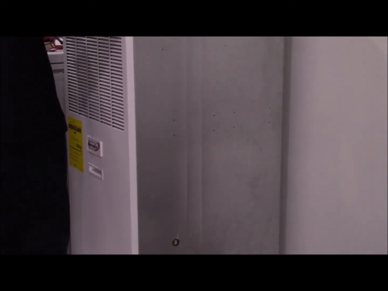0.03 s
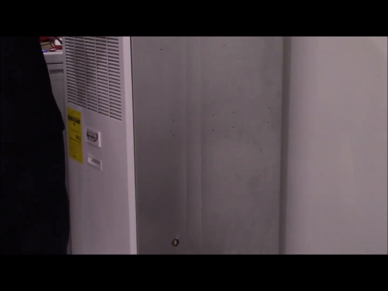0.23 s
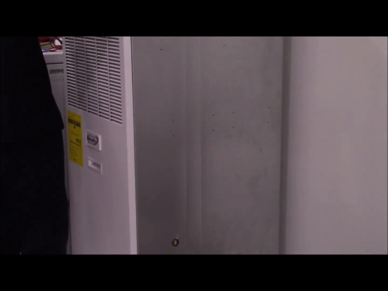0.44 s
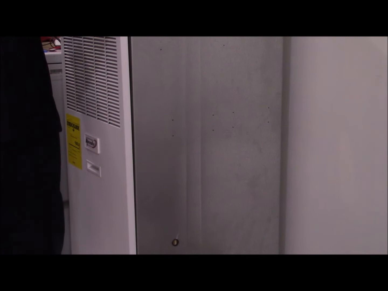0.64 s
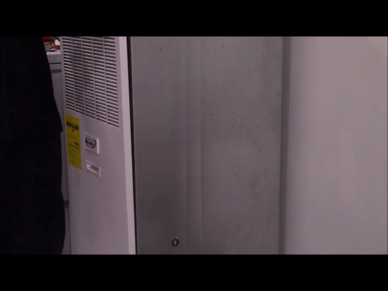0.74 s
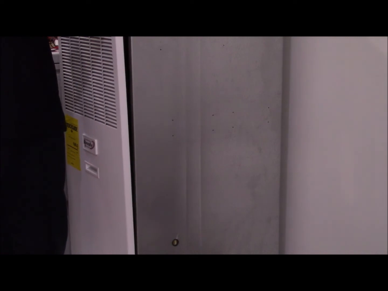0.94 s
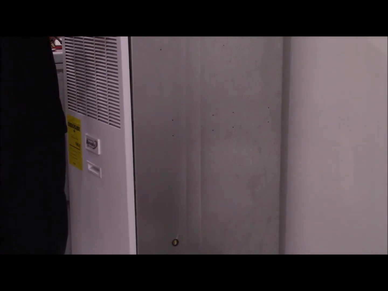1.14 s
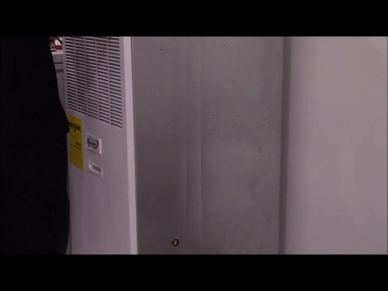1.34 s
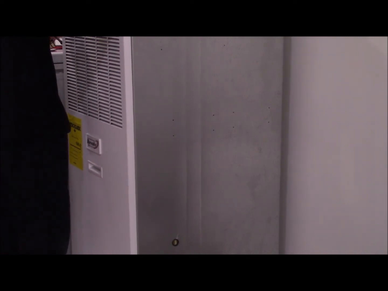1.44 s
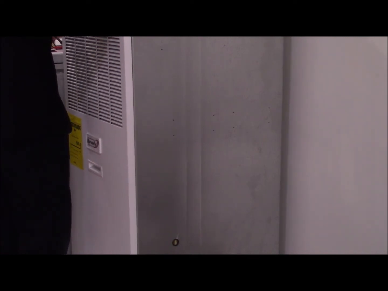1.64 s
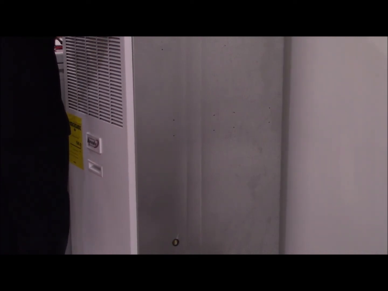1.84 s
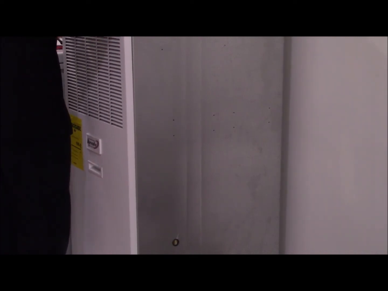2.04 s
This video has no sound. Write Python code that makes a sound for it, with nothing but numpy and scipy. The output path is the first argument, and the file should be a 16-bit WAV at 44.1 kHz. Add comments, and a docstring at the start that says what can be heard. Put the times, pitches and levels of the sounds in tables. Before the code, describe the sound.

A sheet-metal furnace cover is fitted in a small room, close and nearly central. Light knocks at 0.1 s lead into a gritty slide and loud, boomy, ringing bangs from 0.23 to 0.6 s. A bright, hard clank snaps it home at 0.84 s and rings away. Soft taps follow from 1.1 s, a duller knock at 1.32, a tiny squeak at 1.38, and a short rub near 1.72 s over faint hum.

```python
"""Furnace cover pushed home

Small utility room, a stereo microphone pair, a tall sheet-metal cover in front and nearly central.
Knocks excite decaying panel and frame modes in dense noise; random stick-slip taps make the scrapes.
The edge snaps home with a bright clank (a noise crack), then softer knocks, a tiny squeak of
narrow-band noise and a last rub. Filtered room noise and a faint mains hum (a sine) lie underneath."""
import sys
import numpy as np
from scipy import signal
from scipy.fft import rfft, irfft
from scipy.io import wavfile

SR = 44100
rng = np.random.default_rng(int(sys.argv[2]) if len(sys.argv) > 2 else 0)


def master_out(mix):
    """Clip the mix to full scale and print it as 16-bit PCM to the path in sys.argv[1]."""
    frames = np.transpose(np.atleast_2d(mix))
    ceiling = np.clip(frames, -1, 1)
    pcm = np.round(ceiling * 32767).astype(np.int16)
    wavfile.write(sys.argv[1], SR, pcm)


N = 92610  # 2.1 s


def amp(db):
    """Decibels to gain."""
    return 10 ** (np.asarray(db) / 20)


def unit(x):
    """Scales to rms 1."""
    return x / np.sqrt(np.mean(x ** 2) + 1e-20)


def read(points, hz):
    """Reads (f/Hz, value) points on a log-frequency axis."""
    f, value = np.transpose(points)
    return np.interp(np.log(hz + 1), np.log(f + 1), value)


def add(mix, s, sound):
    """Mixes a sound in at time s."""
    part = mix[max(round(s * SR), 0):][:len(sound)]
    part += sound[:len(part)]


def colour(x, points, size=4096):
    """Causal minimum-phase filter with the given (f/Hz, level/dB) response."""
    hz = abs(np.fft.fftfreq(size, 1 / SR))
    log_gain = np.log(amp(read(points, hz)))
    # the Hilbert transform of the log gain gives the minimum phase
    response = np.exp(np.conj(signal.hilbert(log_gain)))
    taps = np.fft.ifft(response).real
    return signal.fftconvolve(x, taps[:size // 2])[:len(x)]


# Frequencies at which the tone of a knock is given: f/Hz
TONE_HZ = [110, 350, 560, 900, 2000, 5000, 11000]
# Blows on the cover: t/s, seven strengths at TONE_HZ level/dB, frame's share of the modes (0-1)
KNOCKS = [(0.0954, -14.5, -15, -21, -13, -30.5, -26.5, -19.5, 0.034),
          (0.115, -18.5, -19.5, -26, -20.5, -42, -35, -40, 0.046),
          (0.2295, -27, -7.5, -15.5, -15, -18, -16, -21, 0.042),
          (0.2657, -3.5, 2.5, 1, 2, -7, -2, 3, 0.039), (0.2734, -5, 1.5, 2.5, -0.5, -3.5, -5, -0.5, 0.041),
          (0.3108, -5.5, -10, -23, -3.5, -0.5, -13, -12, 0.031),
          (.336, 0.5, -16.5, -6.5, -8.5, -7, -8.5, -19, 0.044),
          (0.3537, -17, -11, -44, -50, -0.5, -3.5, -7.5, 0.075),
          (.435, -6, -18, -27, -34, -30, -14.5, -22, 0.068),
          (0.5126, -2.5, -14, -8.5, -11, -11.5, -19, -21, 0.054),
          (0.548, -11, -19, -21, -15, -19, -33, -16, 0.07),
          (.562, -10.5, -7, -8, -41, -15.5, -38, -32, 0.11), (.588, -19, -29, -9, -25, -27, -12, -21, 0.11),
          (.602, -15, -35, -24, -21.5, -13.5, -18, -11.5, 0.29),
          (0.647, -18, -36, -45, -13.5, -55, -19.5, -13.5, 0.17),
          (0.7688, -13, -46, -36, -28, -29.5, -27, -31.5, 0.49),
          (0.8281, -9, -39, -30, -11.5, -7, -5.5, -6.5, 0.87), (0.8411, -15, -4, -6.5, 0, 6, 4, 4.5, 0.83),
          (1.112, -22, -28, -48, -38, -35, -29.5, -37, 0.42),
          (1.168, -34, -36, -47, -27.5, -45, -38, -44, 0.057),
          (1.211, -32, -21.5, -25, -23.5, -25.5, -31, -21.5, 0.33),
          (1.277, -21, -30, -27.5, -27, -31, -29, -36, 0.27),
          (1.3152, -9.5, -11.5, -10, -12, -20.5, -24.5, -23.5, 0.014),
          (1.364, -17, -17, -17, -16.5, -36, -38, -48, 0.016),
          (1.5495, -33, -42, -42, -40, -41, -37, -38, .1),
          (1.72, -11, -27.5, -28.5, -31, -22.5, -32.5, -33, 0.37),
          (1.788, -12.5, -47, -32.5, -33, -52, -50, -44, 0.05)]
EARLIER_RING_DB, EARLIER_AGE_S = -23.5, .08  # the panel is still ringing as the scene opens


def knocks():
    """Each blow lands on another spot of the sheet and so has its own tone."""
    out = np.zeros(N)
    for s, *tone_db, frame_share in KNOCKS:
        tone = list(zip(TONE_HZ, tone_db))
        add(out, s, colour(ring(frame_share), tone))
    earlier = ring(0)[round(EARLIER_AGE_S * SR):]
    add(out, 0, amp(EARLIER_RING_DB) * earlier)
    return out


# Dense ring of sheet and room:
# f/Hz, rise/s, t60 of the first clatter/s, tail level/dB, t60 of the tail/s
RING = [(90, 0.014, 0.074, -1, 0.77), (204, 0.022, 0.14, 7.5, 0.58), (390, 0.0028, 0.23, -3, 0.71),
        (1070, 0.0016, 0.15, -2.5, 0.47), (2440, 0.00071, 0.18, -1.5, 0.42),
        (5500, 0.0025, 0.16, -1.5, 0.38), (11900, 0.0023, 0.057, 3.5, 0.19)]
# Clear modes of the panel: f/Hz, level/dB, t60/s
PANEL_MODES = [(92, -23, 0.61), (234.9, -22.5, 0.64), (327.7, -26, 0.75), (356, -20, 0.75),
               (378.4, -30.5, 0.3), (490.7, -26.5, 0.65), (550.3, -24.5, 0.5), (611.7, -25.5, 0.53),
               (671.4, -24.5, 0.52), (797, -18, 0.37), (895, -45, .4), (1191, -15.5, 0.25),
               (1772, -39, 0.22), (2004, -24.5, .55), (2710, -17, 0.38), (3120, -25, 0.27)]
# Clear modes of the frame: f/Hz, level/dB, t60/s
FRAME_MODES = [(340.4, -17, 0.17), (373.7, -13.5, 0.3), (692, -20.5, .5), (1063, -12.5, 0.2),
               (1136, -28, 0.65), (1397, -7.5, 0.2), (1600, -19, 0.28), (1883, -12, 0.24),
               (2110, -34, 0.22), (2190, -27, .33), (2490, -14.5, 0.31), (2798, -27, 0.61),
               (3590, -17, 0.32), (3770, -14, 0.11), (4640, -13, 0.25)]
CLATTER_DB = 4  # first clatter in every band of a tap


def ring(frame_share):
    """Answer to one tap: a quick clatter, a tail in the room, and the clear modes of panel and frame."""
    t, hz = np.arange(SR) / SR, np.fft.rfftfreq(SR, 1 / SR)
    dense = rfft(rng.standard_normal(SR))
    centres = [row[0] for row in RING]
    out = np.zeros(SR)
    # each band fades into its neighbours
    for own, (_, rise, clatter_t60, tail_db, tail_t60) in zip(np.eye(len(RING)), RING):
        weight = read(list(zip(centres, own)), hz)
        band = irfft(dense * weight, SR)
        clatter = amp(CLATTER_DB - 60 * t / clatter_t60)
        tail = amp(tail_db - 60 * t / tail_t60)
        out += band * (1 - np.exp(-t / rise)) * np.hypot(clatter, tail)
    share = np.clip(frame_share, 0, 1)
    panel = np.sqrt(1 - share) * modes(PANEL_MODES, t)
    frame = np.sqrt(share) * modes(FRAME_MODES, t)
    return out + panel + frame


def modes(table, t):
    """Decaying partials, each starting at a random phase."""
    out = np.zeros(len(t))
    for hz, db, t60 in table:
        out += amp(db - 60 * t / t60) * np.sin(2 * np.pi * (hz * t + rng.random()))
    return out


# Spectrum of the crack: f/Hz, level/dB
SNAP = [(200, -41), (800, -30), (1400, 6), (2100, -12), (3100, 7.5), (4200, -11), (6000, -7), (8000, -32),
        (10300, -9), (15000, -39)]
SNAP_S, SNAP_RISE_S, SNAP_T60_S = .8412, 0.0011, 0.073
SNAP_DB = -11  # of the unit-rms noise, before its rise and decay


def snap():
    """The edge springs past the lip of the frame: the hard, bright crack at the front of the clank."""
    t, out = np.arange(SR // 4) / SR, np.zeros(N)
    crack = unit(colour(rng.standard_normal(len(t)), SNAP))
    rise = 1 - np.exp(-t / SNAP_RISE_S)
    add(out, SNAP_S, crack * rise * amp(SNAP_DB - 60 * t / SNAP_T60_S))
    return out


# Three strokes along the frame: the long slide in, a soft nudge, the last rub.
# Columns of each: t/s, friction level/dB, boom of the sheet level/dB, grit level/dB
SLIDE = [(.13, -33.5, -12, 8), (.19, -17, -15, -3), (.238, -11, -6, 1), (.262, -12, -13, 0),
         (.3, -10.5, 10, 11.5), (.365, -10.5, -1, -8), (.39, -23.5, 21.5, -9), (.45, -11.5, -34, -2),
         (.54, -11.5, -1, -10), (.58, -28.5, 1, 4), (.62, -29.5, 0, 6.5), (.69, -30.5, 6, 4.5),
         (.73, -31, -6, -8)]
NUDGE = [(1.14, -48, 0, 14), (1.18, -38, 0.014, -11), (1.228, -32, 0, 0), (1.25, -44, 0.19, 2),
         (1.31, -34.5, 0, -17), (1.34, -25.5, -2, -10), (1.38, -42, 0, -4)]
RUB = [(1.688, -37, 16, 11), (1.708, -20.5, -1, -12), (1.725, -23, 0, -11), (1.748, -22.5, -6, -20),
       (1.77, -40.5, 21.5, -8), (1.82, -42, 14, -6), (1.87, -57, 19, 1), (1.96, -40.5, 17, -15),
       (2.02, -54, 5, 0)]
SLIPS_PER_S = 1200  # on average
SLIP_SPREAD_DB = 5.  # times an exponential draw of mean 1, capped at 3
BOOM_HZ, GRIT_HZ = 203, 3900  # boom lies below, grit above


def scrape(stroke, frame_share=.15):
    """The edge sticks and slips along the frame; every slip taps the sheet."""
    t = np.arange(N) / SR
    s, *columns = np.transpose(stroke)
    level, boom, grit = [amp(np.interp(t, s, c)) for c in columns]
    happens = rng.random(N) < SLIPS_PER_S / SR
    sign = rng.choice([-1, 1], N)
    strength = amp(SLIP_SPREAD_DB * np.minimum(rng.exponential(1, N), 3))
    slips = unit(happens * sign * strength)
    low = signal.sosfilt(signal.butter(1, BOOM_HZ, fs=SR, output="sos"), slips)
    high = signal.sosfilt(signal.butter(1, GRIT_HZ, "high", fs=SR, output="sos"), slips)
    moving = (t > s[0]) * (t < s[-1])
    force = level * (slips + (boom - 1) * low + (grit - 1) * high) * moving
    answer = ring(frame_share)
    return signal.fftconvolve(force, answer / np.linalg.norm(answer))[:N]


SQUEAK_S, SQUEAK_DB, SQUEAK_T60_S = 1.377, -47, 0.044
SQUEAK_HZ, SQUEAK_WIDTH_HZ = 7400, 230  # centre, and offset at which the amplitude weight halves


def squeak(rise_s=.002, room_db=-13, room_t60=0.34):
    """A thin, short squeal of metal on metal, with a weaker, slower fade for its echo in the room."""
    t, hz, out = np.arange(SR) / SR, np.fft.rfftfreq(SR, 1 / SR), np.zeros(N)
    peak = 1 + ((hz - SQUEAK_HZ) / SQUEAK_WIDTH_HZ) ** 2
    squeal = unit(irfft(rfft(rng.standard_normal(SR)) / peak, SR))
    fade = amp(-60 * t / SQUEAK_T60_S) + amp(room_db - 60 * t / room_t60)
    add(out, SQUEAK_S, amp(SQUEAK_DB) * squeal * (1 - np.exp(-t / rise_s)) * fade)
    return out


# Spectrum of the room noise: f/Hz, relative level per Hz/dB
AIR = [(25, -29), (60, -4), (120, -4), (220, -1), (350, 2.5), (600, -3.5), (1000, -8), (1500, -13),
       (2400, -10), (4000, -18.5), (7000, -23), (11000, -29.5), (15500, -38)]
AIR_DB, HUM_HZ, HUM_DB = -52.5, 118.3, -61  # rms levels


def room_tone():
    """Steady filtered room noise and a mains hum of one sine."""
    hum = unit(np.sin(2 * np.pi * HUM_HZ * np.arange(N) / SR))
    air = unit(colour(rng.standard_normal(N), AIR))
    return amp(AIR_DB) * air + amp(HUM_DB) * hum


def spread(x, width, size=500):
    """Wall reflections, as a short noise response, make the two channels differ slightly."""
    walls = rng.standard_normal(size) * np.hanning(size)
    reflected = signal.fftconvolve(x, walls / np.linalg.norm(walls))[:N]
    side = colour(reflected, width)
    return np.array([x + side, x - side])


# How the sheet radiates: f/Hz, level/dB
SHEET = [(25, -44), (55, -21.5), (90, -16), (130, -12.5), (225, -8), (345, 0), (560, -3.1), (900, -7),
         (1400, -9.5), (2300, -10.5), (3900, -16.5), (6300, -21), (9800, -30), (13600, -39.5), (16000, -43)]
# Stereo width of the cover: f/Hz, side against mid level/dB
COVER_WIDTH = [(60, -13), (180, -36), (350, -38), (700, -24.5), (1400, -19.5), (2800, -19), (6000, -15.5),
               (10000, -23.5), (12000, -26)]
# Stereo width of the room tone: f/Hz, side against mid level/dB
AIR_WIDTH = [(100, -20.5), (400, -13), (1500, -9.5), (7000, -11), (10000, -11), (14000, -18)]


def scene():
    """Knocks and scrapes sound through one sheet, over the room tone; the snap comes straight from the front."""
    strokes = scrape(SLIDE) + scrape(NUDGE) + scrape(RUB)
    cover = colour(knocks() + strokes, SHEET)
    return spread(cover + squeak(), COVER_WIDTH) + snap() + spread(room_tone(), AIR_WIDTH)


CUTOFF_HZ = 15800


def record(dry, balance_db=0.08):
    """The left channel is a little louder; the highest peaks are rounded off; then the band limit."""
    tilted = dry * amp([[balance_db], [-balance_db]])
    rounded = tilted / (1 + (tilted / .88) ** 8) ** (1 / 8)
    low_pass = signal.firwin(511, CUTOFF_HZ, window=("kaiser", 9), fs=SR)
    return signal.oaconvolve(rounded, low_pass[None], "same")


dry = scene()
out = record(dry)
master_out(out)
```